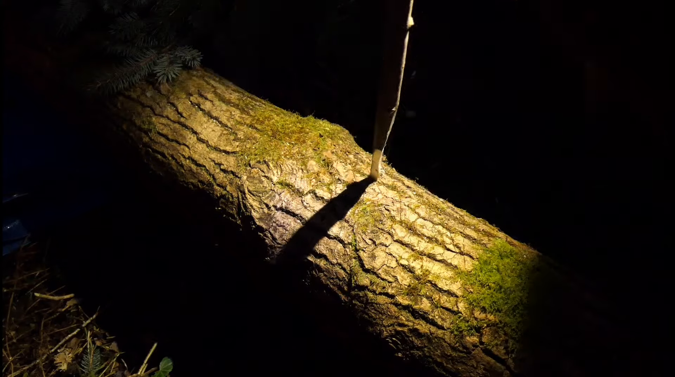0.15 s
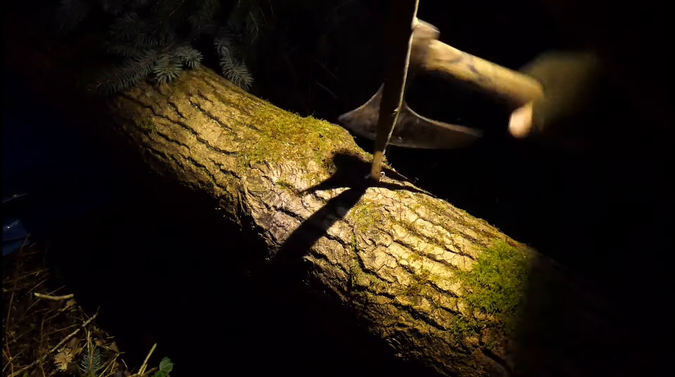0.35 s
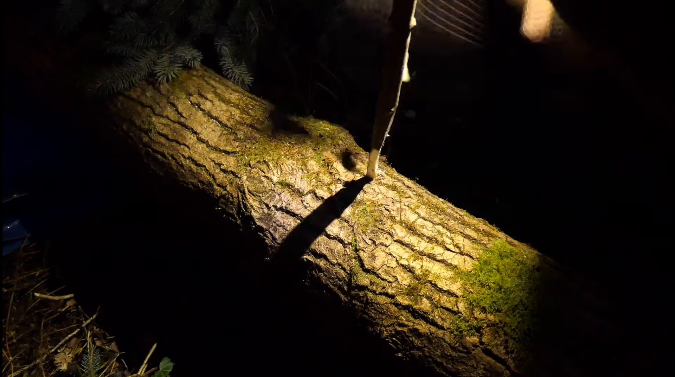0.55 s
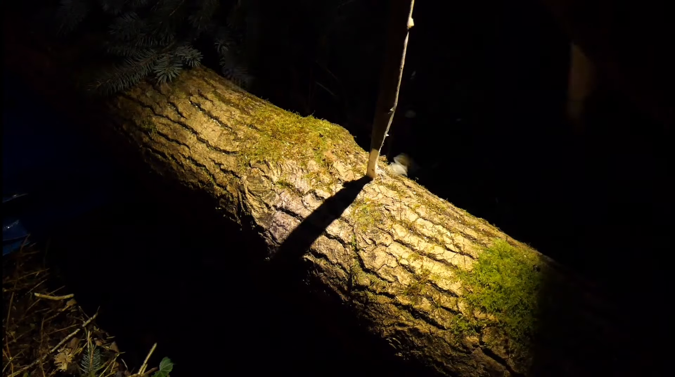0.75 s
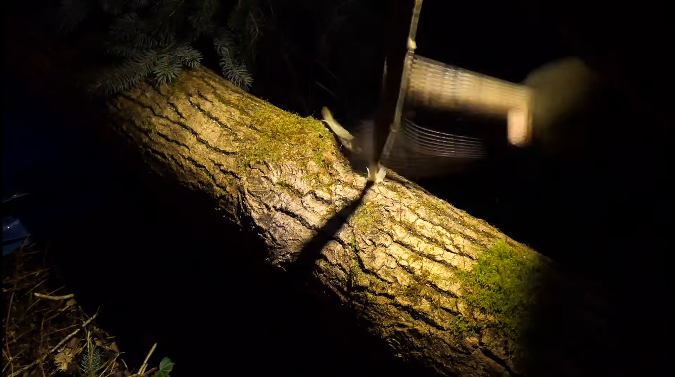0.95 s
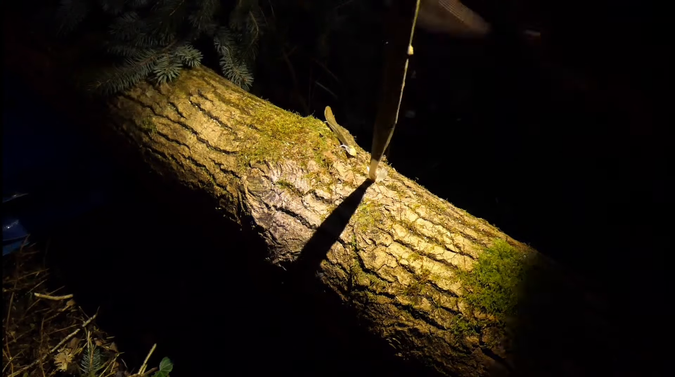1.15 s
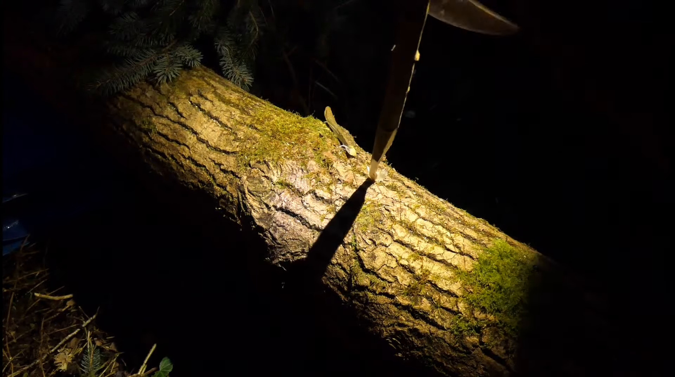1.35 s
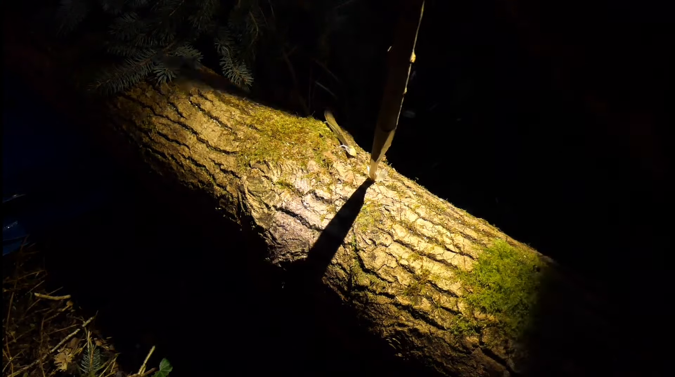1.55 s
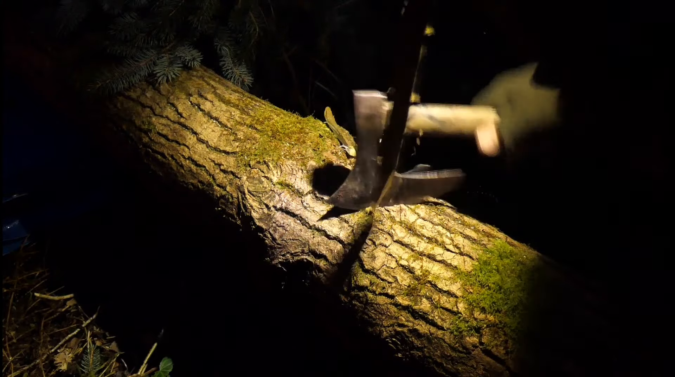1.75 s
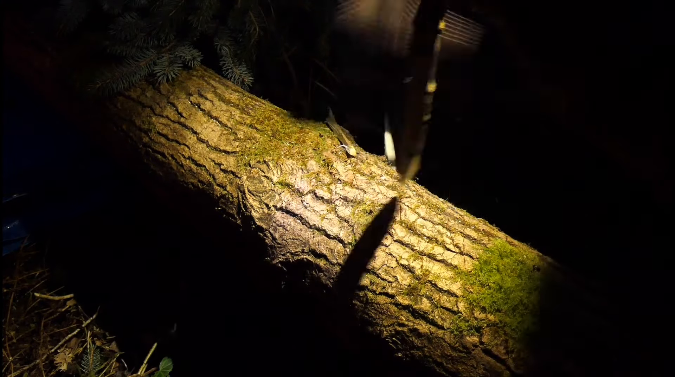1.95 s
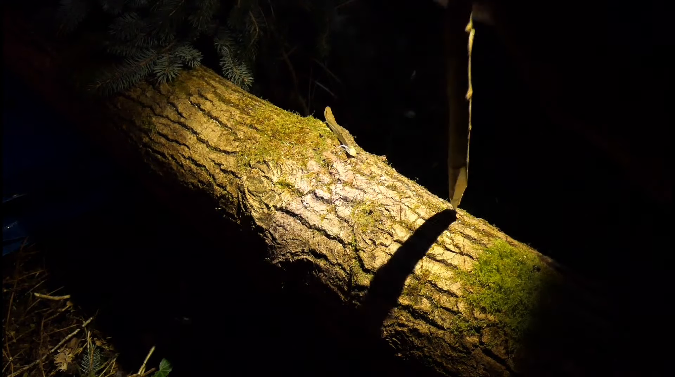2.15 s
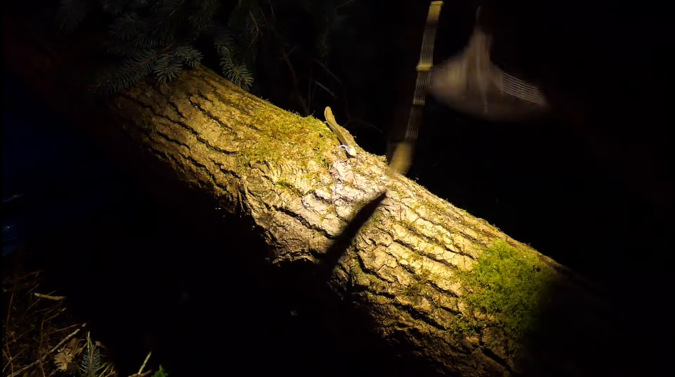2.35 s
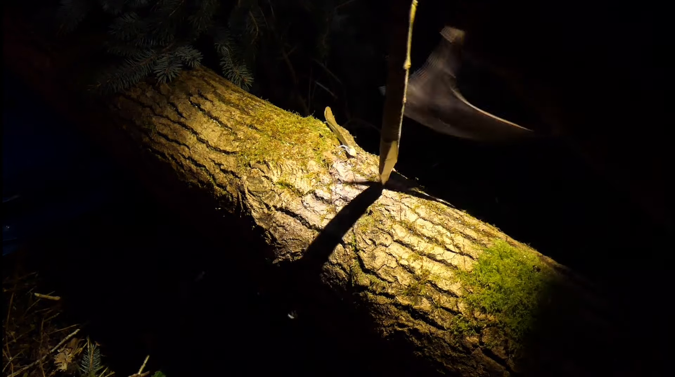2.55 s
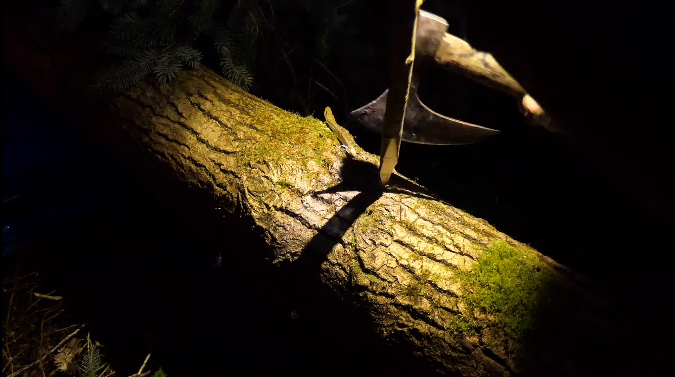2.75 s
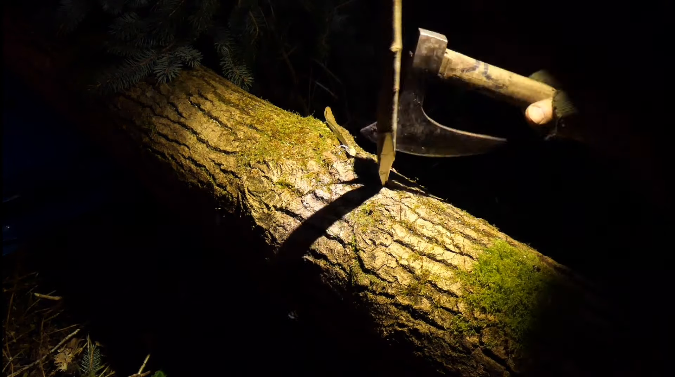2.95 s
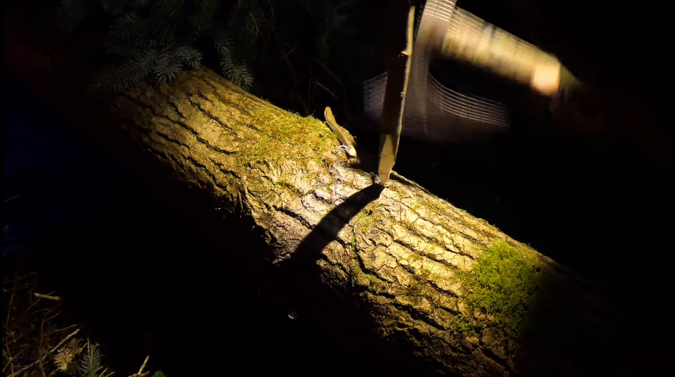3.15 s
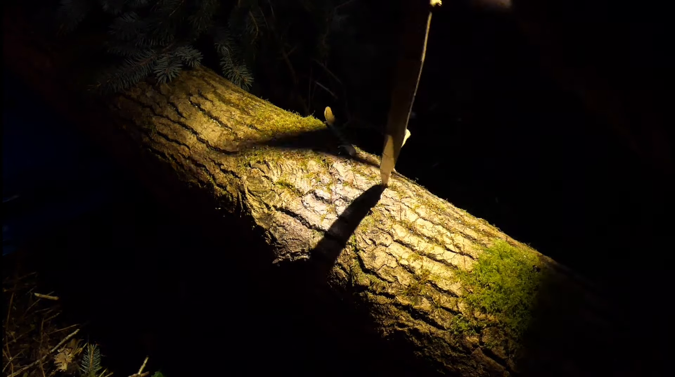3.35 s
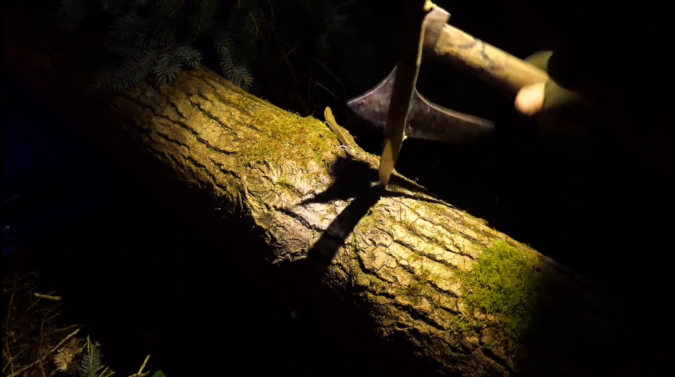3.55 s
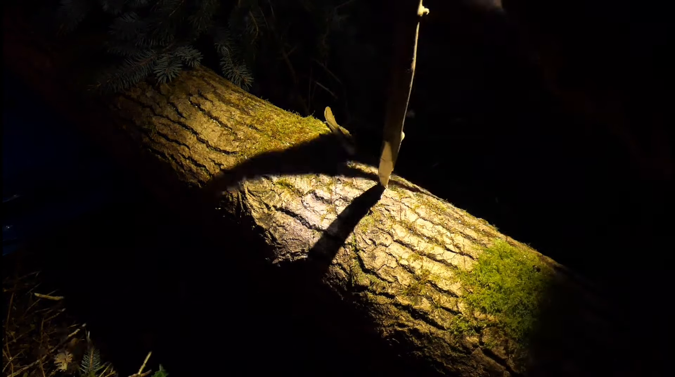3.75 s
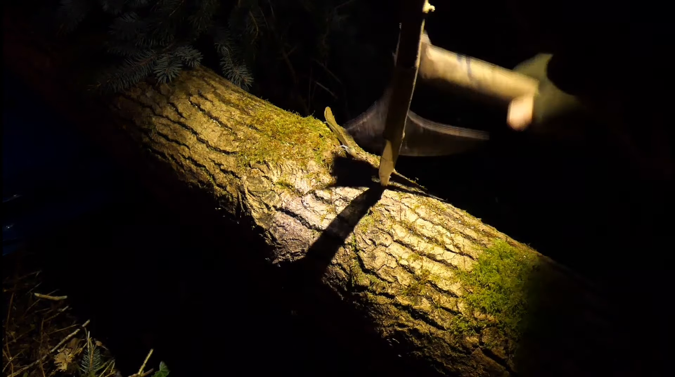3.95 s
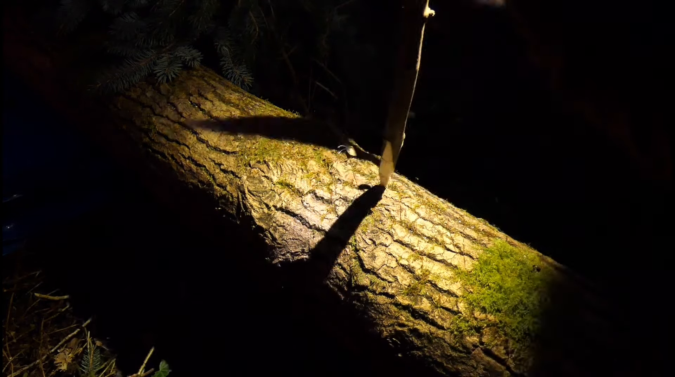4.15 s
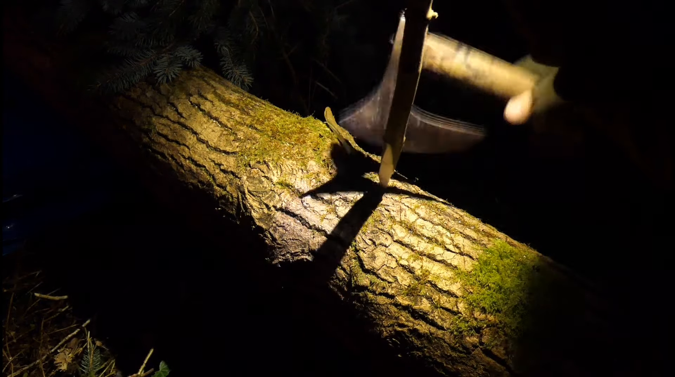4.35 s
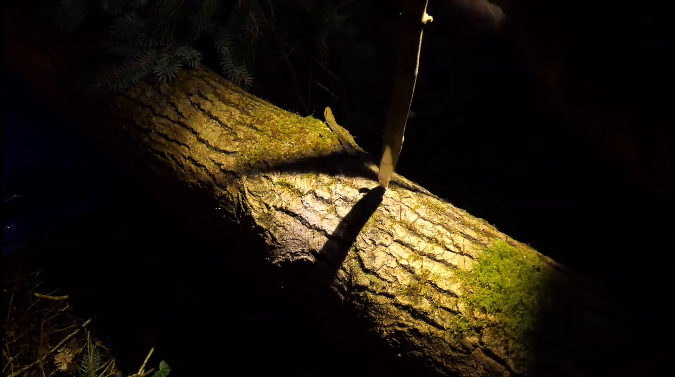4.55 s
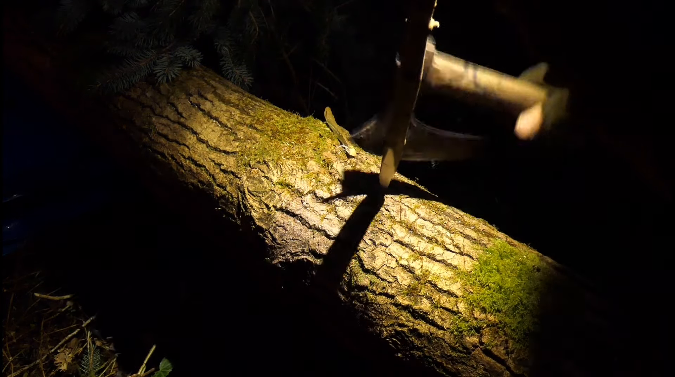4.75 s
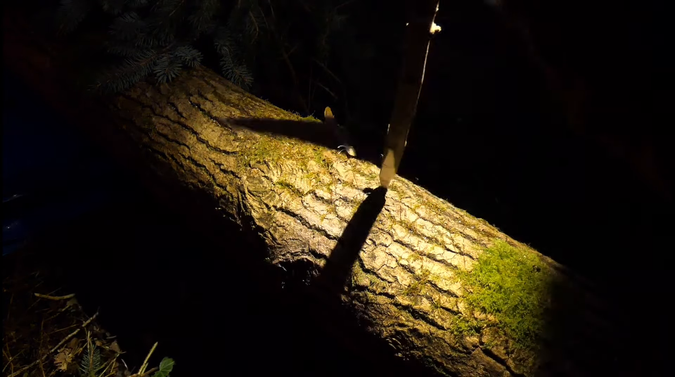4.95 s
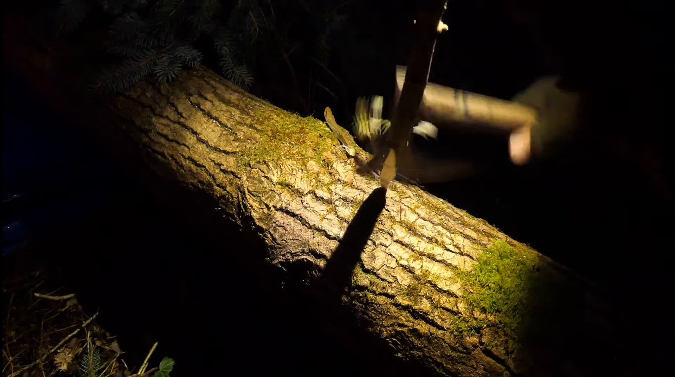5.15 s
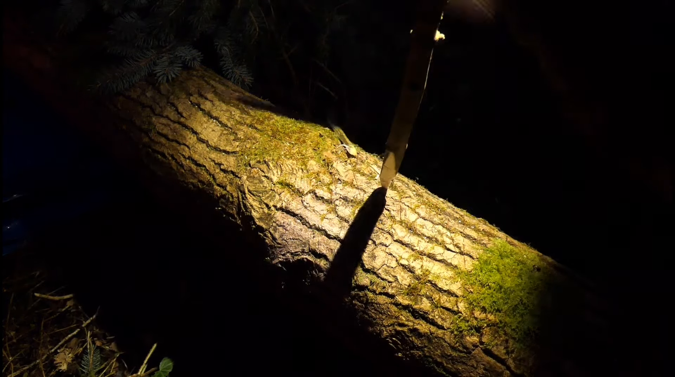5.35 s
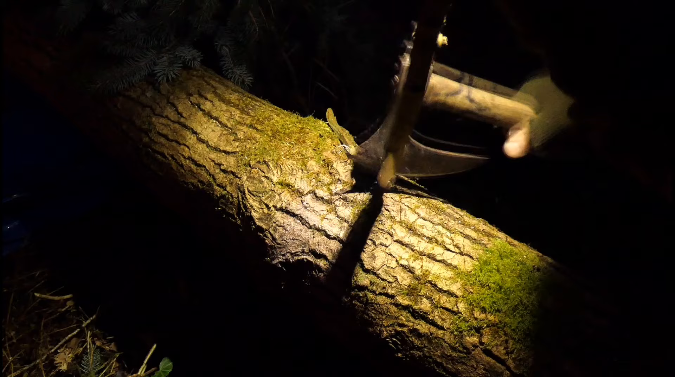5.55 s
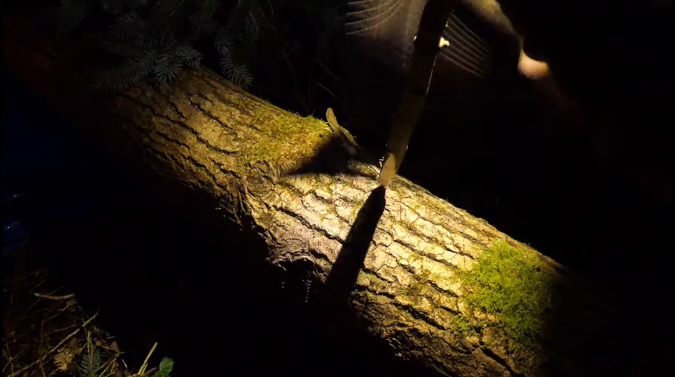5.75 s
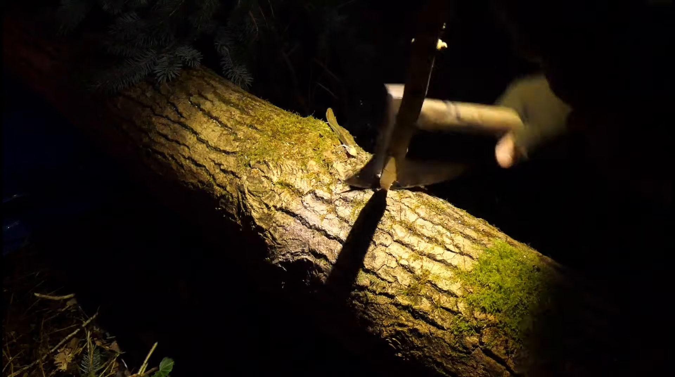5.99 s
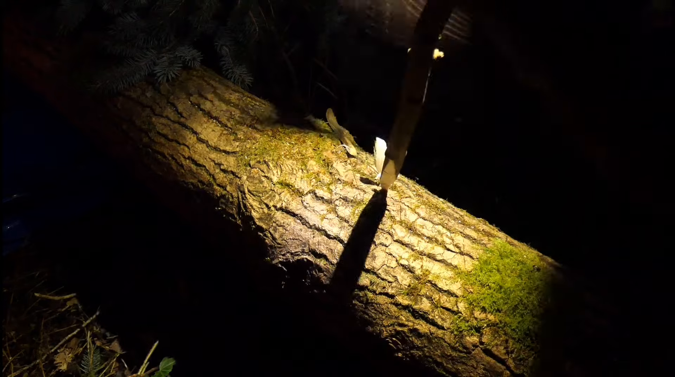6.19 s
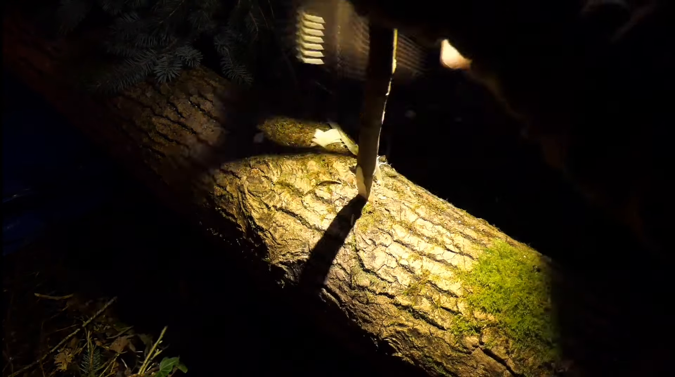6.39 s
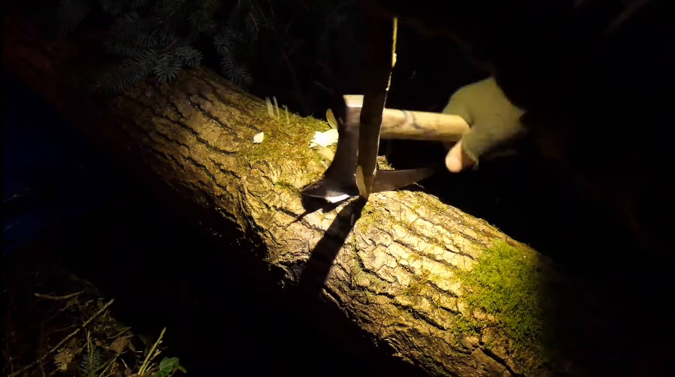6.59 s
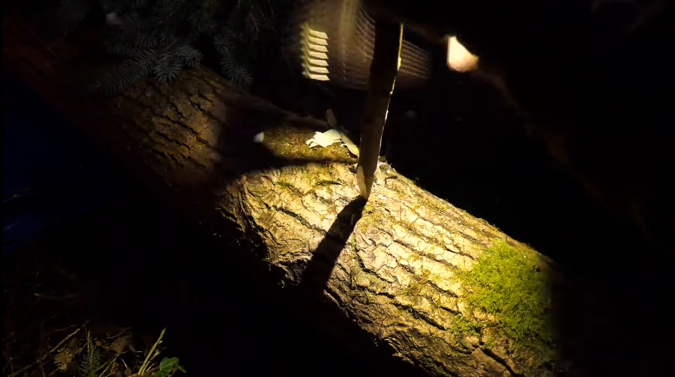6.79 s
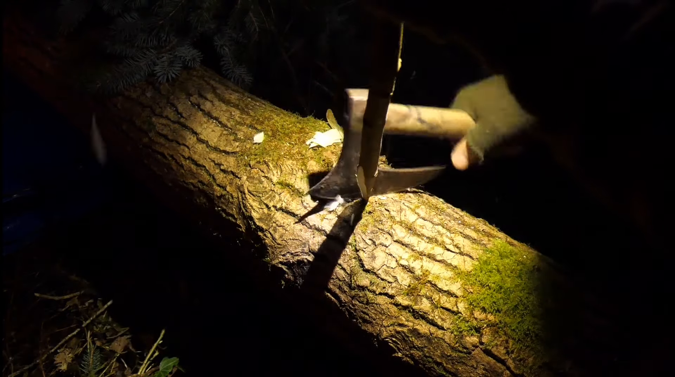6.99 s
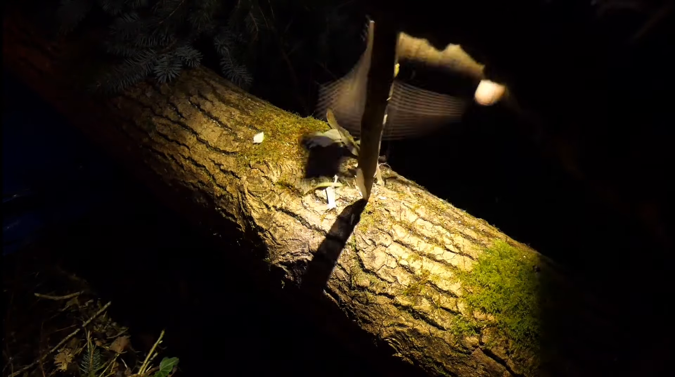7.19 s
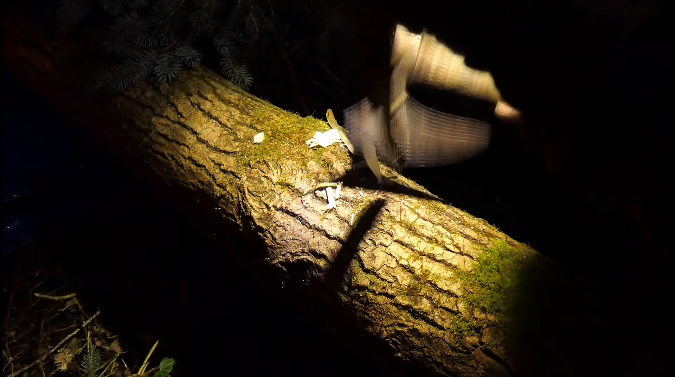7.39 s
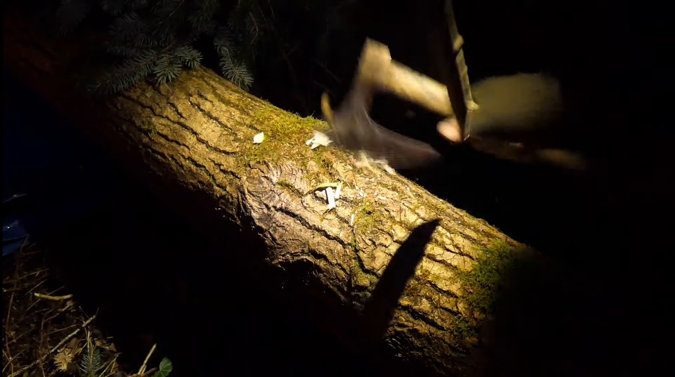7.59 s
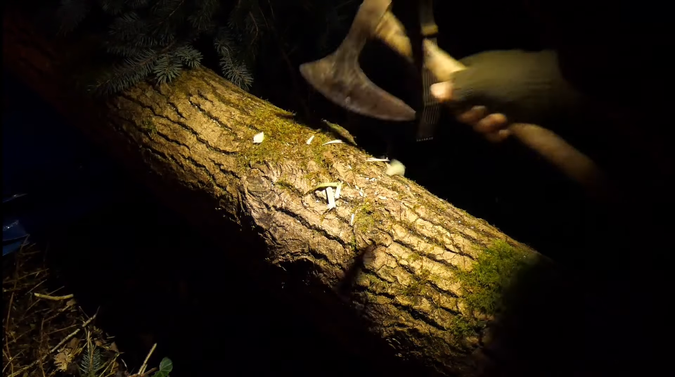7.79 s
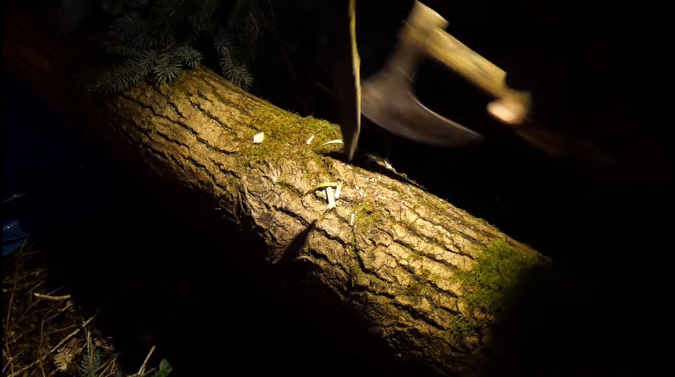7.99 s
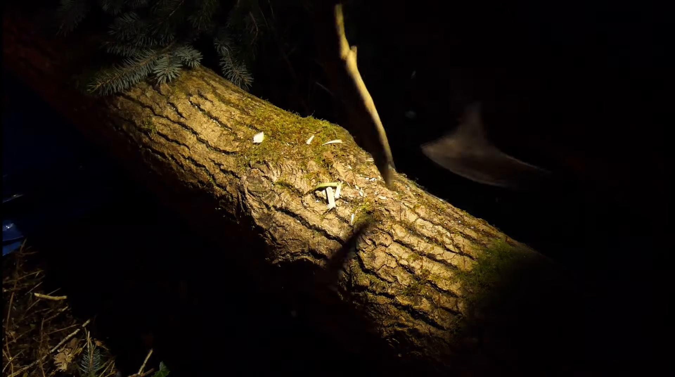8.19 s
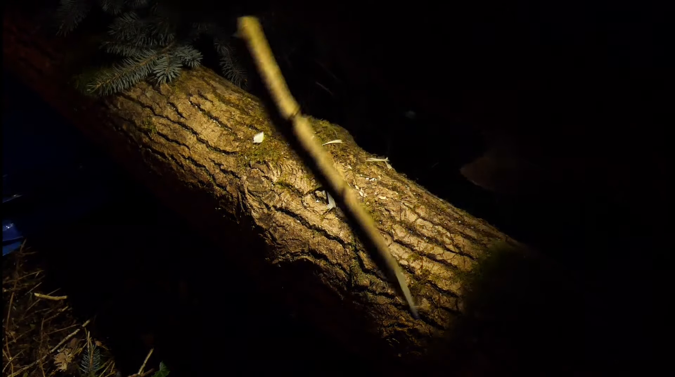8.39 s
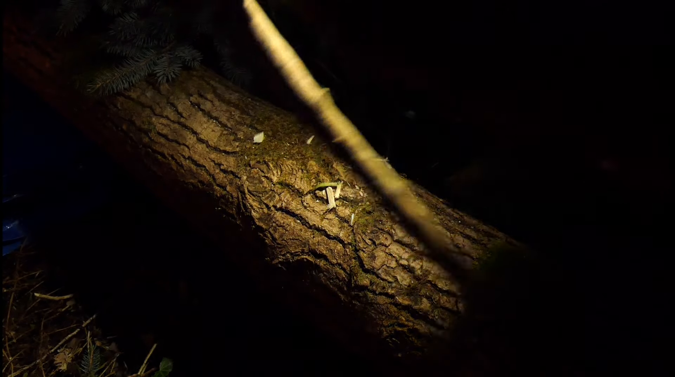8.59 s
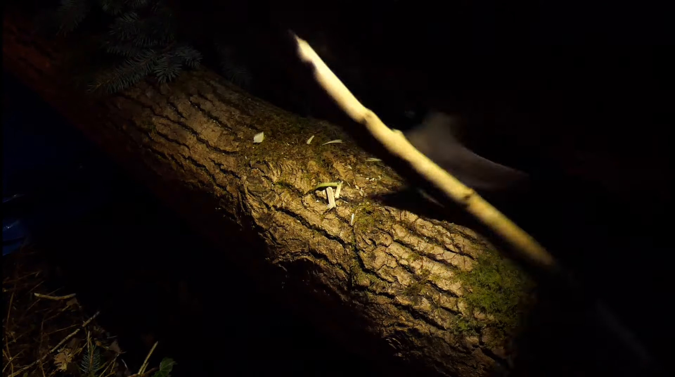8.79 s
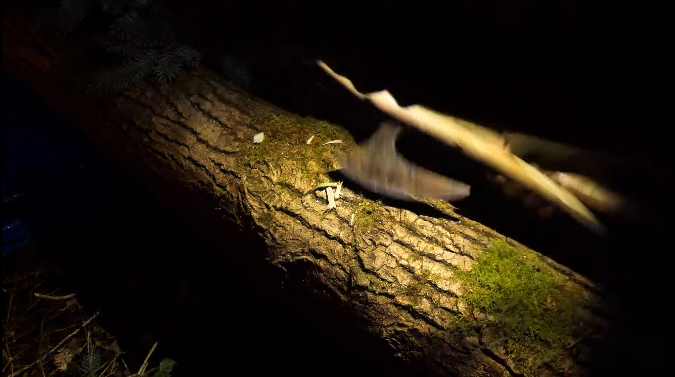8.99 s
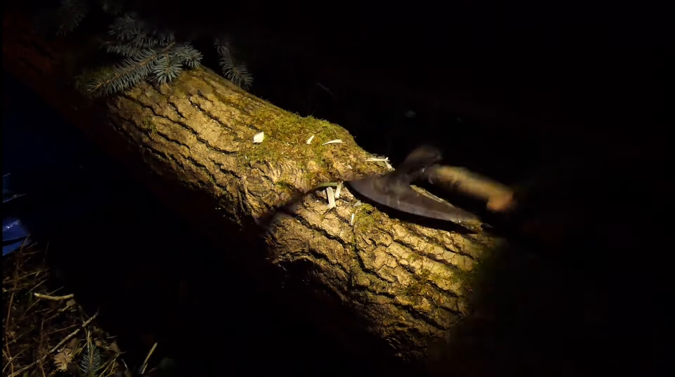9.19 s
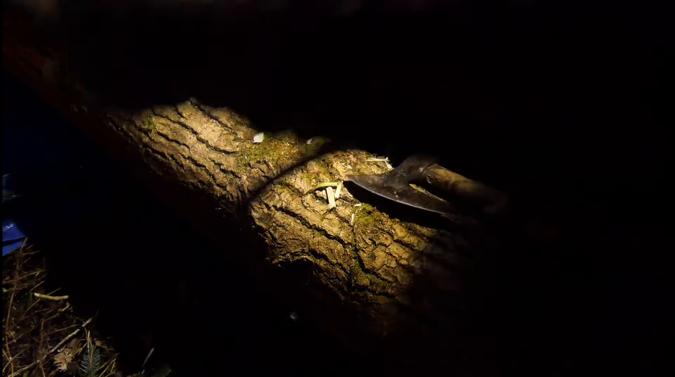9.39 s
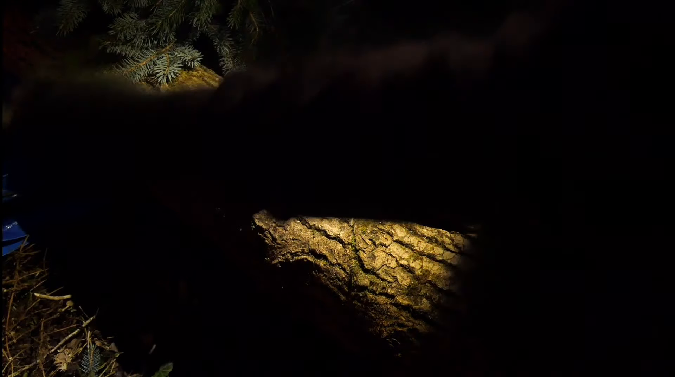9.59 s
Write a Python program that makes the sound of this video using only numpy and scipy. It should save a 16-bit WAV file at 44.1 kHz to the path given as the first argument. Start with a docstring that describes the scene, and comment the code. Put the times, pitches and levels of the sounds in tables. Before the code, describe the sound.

Close, dry axe blows snap through wood about twice a second, with faint scrapes and bumps, while distant birds whistle over soft forest air.

```python
"""Chopping a stick in woodland

A hand axe chops, close by, through a stick held upright on a mossy log. Each blow sums the decaying modes
of stick and blade, noise bursts for tearing and snapping fibres, and a thud of log modes and low noise.
Cracks, bumps, scrapes and the ringing free blade come during and between the blows; bark and needles tick.
Gliding tones make the small birds further off, scattered echoes the trees, filtered noise the background."""
import sys
import numpy as np
from scipy import signal
from scipy.fft import rfft, irfft, next_fast_len
from scipy.io import wavfile
from scipy.ndimage import uniform_filter1d

SR = 44100
rng = np.random.default_rng(int(sys.argv[2]) if len(sys.argv) > 2 else 0)


def unload_wav(signal):
    """Save mono or channel-first audio to the path in sys.argv[1] as 16-bit WAV at rate SR, clipped to [-1, 1]."""
    wavfile.write(
        sys.argv[1],
        SR,
        np.round(np.clip(np.atleast_2d(signal).T, -1, 1) * 32767).astype(np.int16),
    )


N = 424683  # length in samples


def amp(db):
    """Level law: decibels to an amplitude gain."""
    return 10 ** (np.asarray(db) / 20)


def unit(x):
    """Normalization: scales a signal to rms 1."""
    return x / np.sqrt(np.mean(x ** 2) + 1e-20)


def read(points, hz):
    """Logarithmic frequency scale: interpolates a table's value along it."""
    f, value = np.transpose(points)
    return np.interp(np.log(hz + 1), np.log(f + 1), value)


def clock(length):
    """Sampling: the sample times of a sound of this length in seconds."""
    return np.arange(max(int(length * SR), 2)) / SR


def add(mix, s, sound):
    """Superposition: sums a sound into the mix from time s in seconds."""
    part = mix[max(round(s * SR), 0):][:len(sound)]
    part += sound[:len(part)]


HZ = np.fft.rfftfreq(2048, 1 / SR)


def colour(x, points):
    """Minimum-phase filtering: a causal filter of unit energy with the given spectrum."""
    log_gain = np.log(amp(read(points, HZ)))
    mirrored = np.r_[log_gain, log_gain[-2:0:-1]]
    response = np.exp(np.conj(signal.hilbert(mirrored)))[:len(HZ)]  # the phase follows from the log gain
    taps = irfft(response)
    return signal.fftconvolve(x, taps / np.linalg.norm(taps))[:len(x)]


def ring(modes, t, tuning=1):
    """Modal superposition: exponentially decaying sines, struck at t = 0."""
    return sum(amp(db - 60 * t / t60) * np.sin(2 * np.pi * hz * tuning * t) for hz, db, t60 in modes)


# axe blows, levels relative: start_s, force_db, knock_db, stick_tuning_factor, bite_db, bite_hz,
# cut_s (time to cut through), snap_db, thud_db
BLOWS = [(.448, -19.5, -31.5, 0.97, -16, 3480, 0.011, -32, -34.5),
         (.999, -18.5, -30, 0.8, -14, 3550, 0.02, -20.5, -34.5),
         (1.8501, -21.5, -22.5, 0.92, -36.5, 3660, 0.016, -18, -22.5),
         (3.6225, -23.5, -23.5, 0.89, -30, 3590, 0.0038, -24.5, -35),
         (4.031, -24.5, -21.5, 0.91, -20.5, 3700, 0.0095, -15, -35),
         (4.4284, -24, -25, 0.94, -13.5, 3710, 0.003, -38, -38),
         (4.8018, -20.5, -21, 1, -16, 3560, 0.01, -24, -30.5),
         (5.234, -24.5, -23, 1.01, -13.5, 3790, 0.013, -15, -54),
         (5.7095, -24, -31, .94, -12.5, 3510, 0.0016, -21.5, -28.5),
         (6.115, -19.5, -21.5, 1.017, -16.5, 3440, .011, -21.5, -32),
         (6.3312, -22, -30.5, 0.85, -23, 3240, 0.013, -21, -19.5),
         (6.7153, -19.5, -33, 0.83, -22, 3700, 0.0098, -46, -18),
         (7.1118, -20.5, -23.5, 1.19, -26, 4200, 0.011, -41, -16.5),
         (7.5689, -29.5, -35, 0.96, -34.5, 4230, .014, -24, -52)]
# modes of the blade held in the wood: multiple_of_bite_hz, relative_level_db, t60_s
BITE = [(.94, -24.5, .008), (1, 6.5, 0.0086), (1.11, 4, 0.0078), (1.14, -42.5, .16), (1.29, -7, 0.0098),
        (1.45, -19.5, .01), (2.7, -19, .008)]
# tearing level below the force for a cut of TEAR_S seconds; tearing outlasts each cut by a factor
TEAR_DB, TEAR_S, TEAR_OVERRUN = -2.5, .015, 1.25
LOG_DELAY_S = 0.0015  # from the last fibre to the log


def blows(stick_db=7, blade_db=10, rise=.0005, crunch_db=-9, crunch_top_db=-12, crunch_t60=0.029,
          tear_db=-2, tear_top_db=-11, release=0.0022, snap_top_db=-6.0, snap_t60=0.012,
          drag_db=-22, drag_top_db=-27, drag_t60=0.15):
    """Impact and fracture: modes ring, fibres tear until the last snaps, and the axe drags into the log."""
    out, t = np.zeros(N), clock(.12)
    contact = 1 - np.exp(-t / rise)
    for s, force_db, knock_db, tuning, bite_db, bite_hz, cut, snap_db, thud_db in BLOWS:
        # where the edge lands sets how loud the stick's low modes knock
        modes = []
        for hz, db, t60 in STICK:
            strike_db = np.interp(hz, [1250, 1650], [knock_db, force_db])
            modes.append((hz * rng.normal(1, .01), db + strike_db, t60))
        # neighbouring modes swing opposite ways
        stick = ring(modes[0::2], t, tuning) - ring(modes[1::2], t, tuning)
        held_blade = amp(bite_db + blade_db) * ring(BITE, t, bite_hz)
        add(out, s, contact * (amp(stick_db) * stick + held_blade))

        crunch = contact * amp(-60 * t / crunch_t60)
        add(out, s, wood_noise(t, crunch, force_db + crunch_db, force_db + crunch_top_db, spread_db=-12.0))

        # the same work spread over a longer cut tears more softly
        length = cut * TEAR_OVERRUN
        longer_db = 10 * np.log10(length / TEAR_S)
        tearing_db = force_db + TEAR_DB - longer_db
        # the tearing dies quickly once the edge is through
        tearing = contact * np.exp(-np.maximum(t - length, 0) / release)
        add(out, s, wood_noise(t, tearing, tearing_db + tear_db, tearing_db + tear_top_db, spread_db=5))

        # a deeper cut throws more splinters; a louder snap leaves more to drag through
        depth_db = force_db + longer_db
        add(out, s + cut, crack(snap_db, depth_db + snap_top_db, snap_t60))
        drag = contact * amp(-60 * t / drag_t60)
        add(out, s + cut, wood_noise(t, drag, snap_db + drag_db, snap_db + drag_top_db, spread_db=0.5))
        add(out, s + cut + LOG_DELAY_S, thud(thud_db))
    return out


def fibres(t, spread_db):
    """Random impulses: a dense run of tiny snaps of uneven size, rms 1."""
    size = amp(spread_db * np.minimum(rng.exponential(1, len(t)), 4))
    return unit(rng.standard_normal(len(t)) * size)


# modes of the stick: mode_hz, relative_level_db, t60_s
STICK = [(404, -16.5, 0.024), (583, -10, 0.021), (1120, -4, 0.038), (1287, -5.5, 0.026),
         (1667, -1.5, 0.015), (2022, -1.5, 0.012), (2306, 3, 0.017), (2620, -2, 0.016)]
# spectrum of fibres heard through the wood: frequency_hz, relative_level_db_per_hz
FIBRE = [(40, -49), (150, -19.5), (400, -11.5), (750, -34.5), (1100, -4.5), (1500, -9), (2200, 0),
         (3000, 1.5), (3700, 1.5), (4500, -2.5), (6000, -18), (8000, -15), (16000, -52.5)]
# spectrum of the finest splinters: frequency_hz, relative_level_db_per_hz
SPLINTER = [(2500, -27), (5000, -3.5), (6500, -6), (8000, -9), (9800, 6), (12000, 1.5), (15000, -3)]


def wood_noise(t, envelope, body_db, treble_db, spread_db, ringing_db=-5):
    """Source and resonator: breaking fibres ring the stick, while the finest splinters fizz directly."""
    snaps = fibres(t, spread_db) * envelope
    ringing = signal.fftconvolve(snaps, ring(STICK, t))[:len(t)]
    body = unit(unit(colour(snaps, FIBRE)) + amp(ringing_db) * unit(ringing))
    body *= np.sqrt(np.mean(envelope ** 2))
    fizz = colour(fibres(t, spread_db) * envelope, SPLINTER)
    return amp(body_db) * body + amp(treble_db) * fizz


def crack(body_db, treble_db, t60, level_db=6, rise=0.00024):
    """Brittle fracture: wood lets go in one short burst."""
    t = clock(0.035)
    burst = (1 - np.exp(-t / rise)) * amp(-60 * t / t60)
    return amp(level_db) * wood_noise(t, burst, body_db, treble_db, spread_db=6)


# modes of the log: mode_hz, relative_level_db, t60_s
LOG = [(222, -0.5, 0.018), (331, 8, 0.017), (620, -2, 0.018)]
# spectrum of the forest floor: frequency_hz, relative_level_db_per_hz
GROUND = [(30, -46), (70, -34.5), (130, -7.5), (240, 5), (350, -3), (550, -9), (900, -26), (2000, -38.5)]


def thud(db, hard_db=-21, growth=0.2, ground_db=-9, ground_t60=0.2, rise=.00087, spread=0.0094):
    """Damped resonance: the log swings briefly, more under a hard blow, and shudders on the forest floor."""
    t = clock(.25)
    hardness = amp(growth * (db - hard_db))
    swing = hardness * (1 - np.exp(-t / rise)) * ring(LOG, t, rng.normal(1, .06))
    shudder = (1 - np.exp(-t / spread)) * amp(-60 * t / ground_t60)
    rumble = unit(colour(rng.standard_normal(len(t)), GROUND))
    return amp(db) * (amp(ground_db) * shudder * rumble - swing)


# bright cracks of wood, during and between blows: start_s, relative_level_db
CRACKS = [(.031, -45), (0.4603, -24), (1.01, -27), (1.596, -55), (1.8559, -18), (2.362, -46.5),
          (5.125, -51), (6.147, -31), (6.718, -22.5), (7.085, -35), (7.1155, -22.5), (9.509, -39.5)]


def bright_cracks(body_db=-1, treble_db=0, small_t60=0.019, large_t60=0.015):
    """Fracture speed: bright cracks of wood, of which the loud ones die away fastest."""
    out = np.zeros(N)
    for s, db in CRACKS:
        t60 = np.interp(db, [-42, -22], [small_t60, large_t60])
        add(out, s, crack(db + body_db, db + treble_db, t60))
    return out


# axe or stick bumping the log, levels relative: start_s, wood_db, thud_db
BUMPS = [(.598, -50, -56), (7.3188, -40, -54), (7.633, -36, -22.5), (9.414, -54, -39.5),
         (9.585, -44.5, -38.5)]


def bumps(treble_db=-17, t60=0.028, knock_db=-2, tuning=1.4):
    """Soft impact: dull knocks on the bark, each with a thud of the log."""
    out = np.zeros(N)
    for s, wood_db, thud_db in BUMPS:
        add(out, s, crack(wood_db, wood_db + treble_db, t60))
        add(out, s, amp(wood_db + knock_db) * ring(LOG, clock(.05), tuning))
        add(out, s, thud(thud_db))
    return out


# blade, bark and splinters rubbing: start_s, length_s, relative_level_db
SCRAPES = [(0.604, 0.051, -53.5), (1.024, 0.025, -43), (1.925, 0.046, -51.5), (2.527, 0.049, -53.5),
           (2.882, 0.033, -42.5), (2.9, .38, -57), (3.04, 0.096, -49.5), (4.925, .034, -53),
           (7.593, .22, -52.5), (8.006, 0.12, -56), (8.091, 0.1, -51), (9.22, 0.15, -57)]


def scrapes(body_db=1, treble_db=-5.5, slip_db=3, slips_per_s=170):
    """Friction: uneven slips of steel and bark under a short stroke."""
    out = np.zeros(N)
    for s, length, db in SCRAPES:
        t = clock(length)
        slips = rng.standard_normal(256)
        slip_level_db = slip_db * np.interp(t * slips_per_s, np.arange(len(slips)), slips)
        stroke = unit(signal.windows.tukey(len(t), .5) * amp(slip_level_db))
        add(out, s, wood_noise(t, stroke, db + body_db, db + treble_db, spread_db=4.0))
    return out


# the blade comes free and rings: start_s, relative_level_db
RINGS = [(0.109, -51.5), (.62, -51.5), (2.89, -49.5), (4.04, -50.5), (4.936, -50), (6.145, -53),
         (7.585, -39)]
# modes of the free blade: mode_hz, relative_level_db, t60_s
BLADE = [(2492, -13, .25), (3290, 2.5, 0.24), (3820, -9.5, 0.28), (4920, -9, 0.24), (7560, -7, 0.17),
         (9500, -11.5, 0.14), (12310, -9.5, 0.16)]


def blade():
    """Free vibration: the steel head sings faintly when it leaves the cut."""
    out, t = np.zeros(N), clock(.35)
    for s, db in RINGS:
        add(out, s, amp(db) * ring(BLADE, t))
    return out


def litter(per_s=12, body_db=-63, treble_db=-62, t60=0.049, spread_db=3.5):
    """Random arrivals: crumbs of bark and dry needles tick at chance moments, per_s on average."""
    out, t = np.zeros(N), clock(.03)
    size = amp(spread_db * np.minimum(rng.exponential(1, N), 3))
    for i in np.flatnonzero(rng.random(N) < per_s / SR):
        tick = wood_noise(t, amp(-60 * t / t60), body_db, treble_db, spread_db=2)
        add(out, i / SR, size[i] * tick)
    return out


# slurred bird notes: start_s, length_s, first_hz, last_hz, relative_level_db
SLURS = [(1.147, 0.054, 3540, 3530, -63), (1.286, 0.068, 3680, 3730, -62),
         (2.643, 0.062, 5250, 3510, -59.5), (2.845, 0.062, 5320, 4040, -63), (4.977, 0.02, 3420, 3910, -57),
         (5.05, 0.016, 3360, 3850, -50), (6.222, 0.034, 4620, 5700, -64), (6.294, 0.029, 5800, 3980, -52.5),
         (6.902, .085, 7160, 4800, -55.5), (7.028, 0.048, 4800, 5060, -43.5),
         (7.14, 0.0485, 4780, 5390, -54), (7.397, 0.03, 3560, 3890, -44.5),
         (7.423, .032, 3407, 4340, -43.5), (7.504, 0.055, 4280, 5330, -45), (7.624, 0.045, 4370, 4710, -45),
         (7.696, 0.015, 4550, 4100, -54), (8.642, 0.044, 4050, 3680, -48.5)]
# one short falling chirp, repeated: start_s, relative_level_db
CHIRPS = [(2.1, -62.5), (2.179, -52), (3.15, -54), (3.25, -58.5)]
CHIRP_S, CHIRP_HZ, CHIRP_END_HZ = 0.0308, 3420, 3185  # length and pitches
# thin, high, buzzing notes: start_s, length_s, pitch_hz, relative_level_db
BUZZES = [(6.474, 0.19, 6500, -58), (6.828, 0.034, 7500, -57.5), (7.255, .13, 6500, -55.5),
          (8.088, 0.076, 8100, -55), (8.194, 0.055, 7780, -52), (8.29, .048, 7770, -50),
          (8.518, 0.06, 7720, -49.5)]
TRILL_S, CALL_S = 5.385, 8.655  # start times


def birds(buzz=0.054, buzz_hz=170):
    """Frequency modulation: slurs, chirps, a trill and a long call glide; high buzzes flutter in pitch."""
    out = np.zeros(N)
    for s, length, first_hz, last_hz, db in SLURS:
        add(out, s, amp(db) * slur(length, first_hz, last_hz))
    for s, db in CHIRPS:
        add(out, s, amp(db) * slur(CHIRP_S, CHIRP_HZ, CHIRP_END_HZ))
    for s, length, hz, db in BUZZES:
        flutter = buzz * np.sin(2 * np.pi * buzz_hz * clock(length))
        add(out, s, amp(db) * whistle(hz * (1 + flutter), taper=0.6, waver=0.017))
    add(out, TRILL_S, trill())
    add(out, CALL_S, long_call())
    return out


def whistle(hz, taper, waver):
    """Phase as integrated frequency: a pure tone along a pitch curve, with soft ends and a slight waver."""
    smoothed = uniform_filter1d(rng.standard_normal(len(hz)), size=120)
    wobble = unit(uniform_filter1d(smoothed, size=120))
    phase = 2 * np.pi * np.cumsum(hz * (1 + waver * wobble)) / SR
    return np.sqrt(2) * signal.windows.tukey(len(hz), taper) * np.sin(phase)


# the glide speeds up as this power of time; a rising note first dips by this share
SLUR_BEND, SLUR_SCOOP = 2.3, 0.027


def slur(length, first_hz, last_hz):
    """Accelerating glide: a note lingers on its first pitch, then sweeps to its last."""
    u = clock(length) / length
    scoop = SLUR_SCOOP * (last_hz > first_hz) * np.sin(np.pi * u)
    glide_hz = first_hz + (last_hz - first_hz) * u ** SLUR_BEND
    return whistle(glide_hz * (1 - scoop), taper=0.28, waver=.007)


# one syllable of the trill: share_of_syllable (0-1), pitch_hz
SYLLABLE = [(0, 4050), (.22, 5436), (.4, 4715), (.52, 4057), (.6, 4470), (.78, 4700), (.88, 5260),
            (1, 4574)]
TRILL_LENGTH_S, TRILL_DB, TRILL_RISE_S, TRILL_FADE_DB = 0.48, -49, 0.044, 9
TRILL_SYLLABLES_PER_S = 19


def trill(throb_db=5):
    """Periodic modulation: a syllable of two chirps repeats fast, swelling quickly and fading slowly."""
    t = clock(TRILL_LENGTH_S)
    share = (t * TRILL_SYLLABLES_PER_S + .5) % 1
    fade_db = TRILL_FADE_DB * (t / TRILL_LENGTH_S) ** 2
    db = TRILL_DB - fade_db - throb_db * np.cos(4 * np.pi * share)
    tone = whistle(np.interp(share, *np.transpose(SYLLABLE)), taper=.05, waver=.03)
    return np.minimum(t / TRILL_RISE_S, 1) * amp(db) * tone


CALL_LENGTH_S, CALL_DB, CALL_FADE_DB_PER_S = .32, -46, 21.5
CALL_HZ, CALL_SAG_HZ_PER_S, CALL_DROP_HZ, CALL_DROP_S = 3310, 1100, 402, 0.0077


def long_call():
    """Relaxing pitch: a plaintive whistle drops quickly, then sags and fades."""
    t = clock(CALL_LENGTH_S)
    hz = CALL_HZ - CALL_SAG_HZ_PER_S * t + CALL_DROP_HZ * np.exp(-t / CALL_DROP_S)
    return amp(CALL_DB - CALL_FADE_DB_PER_S * t) * whistle(hz, taper=0.021, waver=0.005)


# spectrum of the background: frequency_hz, relative_level_db
AIR = [(15, -81), (25, -42.5), (62, -14), (183, -2.5), (253, -8), (289, -7), (322, -8), (469, -9.5),
       (1270, -18.5), (2360, -15.5), (5280, -28), (10600, -31.5), (15500, -25.5)]
AIR_DB = -56.5  # before the swells
# likeness of left and right: frequency_hz, correlation (-1 to 1)
SAME = [(60, 0.16), (180, 0.28), (550, -0.46), (1650, 0.33), (4970, 0.34), (15000, -0.032)]
# the background swells a little: time_s, added_level_db
STIR = [(0, 7), (.3, 0.5), (6, 1), (7.7, 4.5), (8.4, 2), (9.6, 2.5)]


def air(patchy_db=1):
    """Partial coherence: soft woodland noise, partly alike at both ears, swelling a little."""
    draws = rng.standard_normal((5, N // 512 + 5, len(HZ)))
    a, b, c, d, patches = draws.transpose(0, 2, 1)  # each is frequency by time
    same = np.clip(read(SAME, HZ), -1, 1)[:, None]
    left = a + 1j * b
    right = same * left + np.sqrt(1 - same ** 2) * (c + 1j * d)
    # smooth random patches, alike in both ears, vary the level over frequency and time
    patches = uniform_filter1d(patches, size=24, axis=0)
    patches = unit(uniform_filter1d(patches, size=8, axis=1))
    z = np.array([left, right]) * amp(read(AIR, HZ)[:, None] + patchy_db * patches)
    noise = signal.istft(z, nperseg=2048, noverlap=1536)[1][:, :N]
    return unit(noise) * amp(AIR_DB + np.interp(np.arange(N) / SR, *np.transpose(STIR)))


def echoes(x, decay, delay, likeness):
    """Diffuse reverberation: scattered reflections, each band dying at its own speed."""
    taps = rng.standard_normal((2, SR)) * (rng.random((2, SR)) < .1)
    likeness = np.clip(likeness, 0, 1)
    taps[1] = likeness * taps[0] + np.sqrt(1 - likeness ** 2) * taps[1]
    hz, t, z = signal.stft(taps, SR, nperseg=256)
    tail = signal.istft(z * amp(-60 * t / read(decay, hz)[:, None]), SR, nperseg=256)[1]
    tail = np.pad(tail / np.linalg.norm(tail[0]), ((0, 0), (int(delay * SR), 0)))
    return signal.fftconvolve(x[None], tail, axes=1)[:, :N]


# phase between the two microphone ports: frequency_hz, left_lead_radians
PORTS = [(100, 0.22), (500, .55), (2200, 0.24), (4000, 0.2), (8000, 1)]


def two_ears(x):
    """Interaural phase: the two ports hear a direct sound with slightly different phase."""
    size = next_fast_len(N)
    turn = np.exp(.5j * read(PORTS, np.fft.rfftfreq(size, 1 / SR)))  # half the lead for each side
    return irfft(rfft(x, size) * np.array([turn, turn.conj()]), size)[:, :N]


# decay near the log: frequency_hz, t60_s
NEAR = [(150, 0.11), (500, .14), (1500, 0.062), (4000, 0.091), (12000, 0.11)]
# decay among the trees: frequency_hz, t60_s
TREES = [(200, 0.33), (3500, 1.3), (8000, 0.69)]


def scene(low_cut_hz=95, order=4):
    """Direct and reverberant sound: chopping at arm's length, birds deep among the trees."""
    close = blows() + bright_cracks() + bumps() + scrapes() + blade() + litter()
    # the close sounds carry little deep bass
    close = signal.sosfilt(signal.butter(order, low_cut_hz, "high", fs=SR, output="sos"), close)
    song = birds()
    direct = two_ears(close) * amp([[-.35], [.35]])  # left, right
    chopping = direct + amp(-17.5) * echoes(close, NEAR, delay=.006, likeness=0.8)
    wood = amp(-39.5) * echoes(close, TREES, delay=0.065, likeness=1.0)
    distant = amp(-1.0) * two_ears(song) + amp(-1.0) * echoes(song, TREES, delay=.008, likeness=0.28)
    return chopping + wood + distant + air()


EDGE_HZ = 15600  # upper band limit


def record(dry, notch_hz=3000, notch_q=14, ceiling=2.3):
    """Transducer response: a narrow dip in the microphone, soft overload on peaks, then the band limit."""
    dipped = signal.lfilter(*signal.iirnotch(notch_hz, notch_q, SR), dry)
    pressed = dipped / (1 + (dipped / ceiling) ** 8) ** (1 / 8)
    low_pass = signal.firwin(255, EDGE_HZ, window=("kaiser", 8), fs=SR)
    return signal.oaconvolve(pressed, low_pass[None], "same")


dry = scene()
out = record(dry)
unload_wav(out)
```